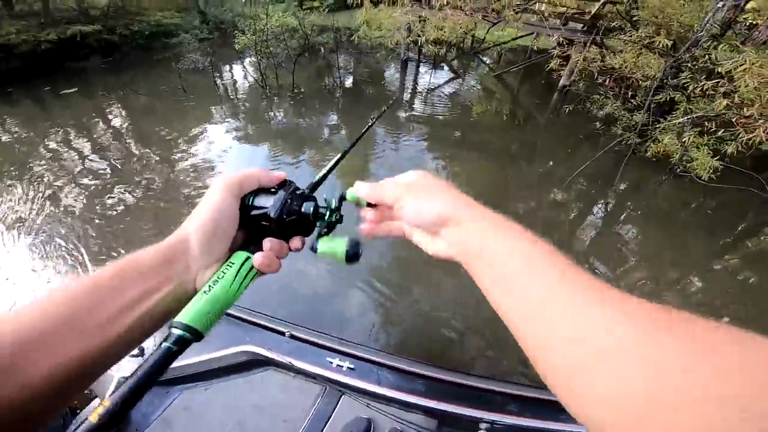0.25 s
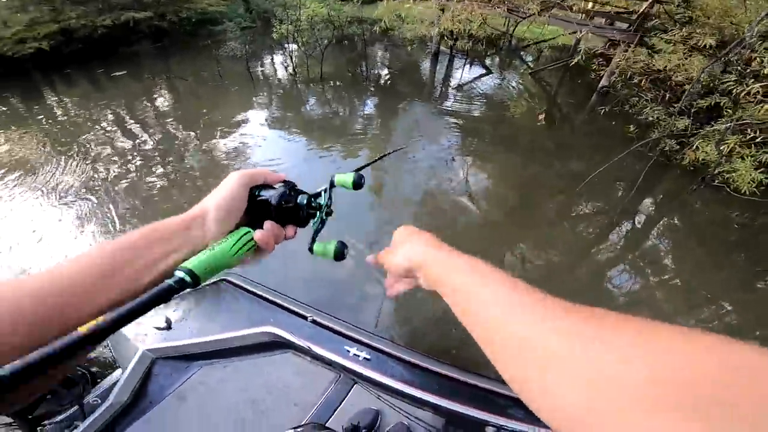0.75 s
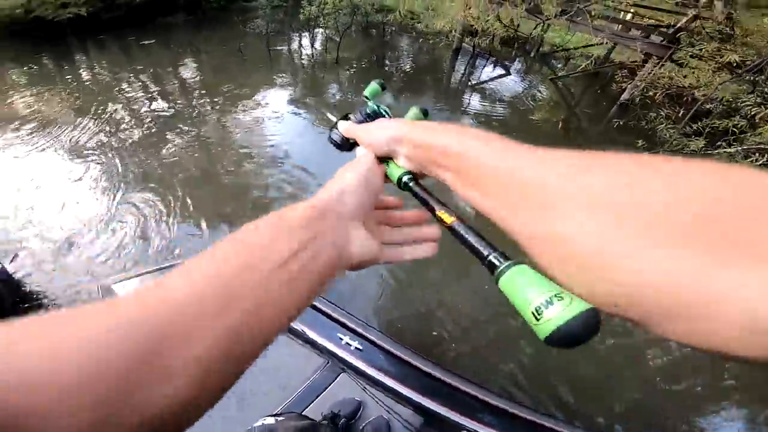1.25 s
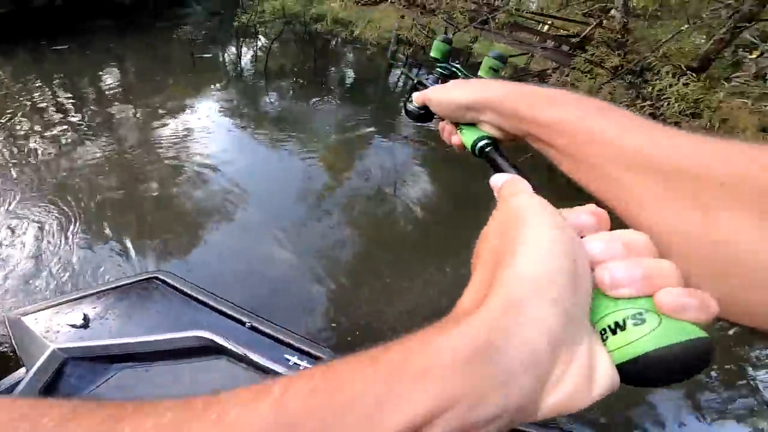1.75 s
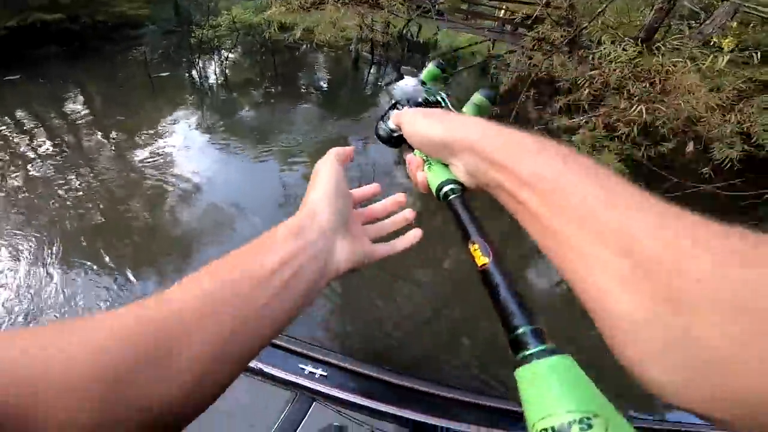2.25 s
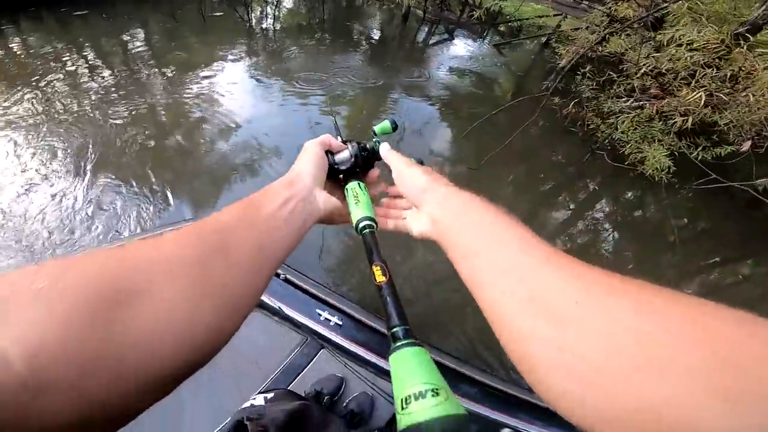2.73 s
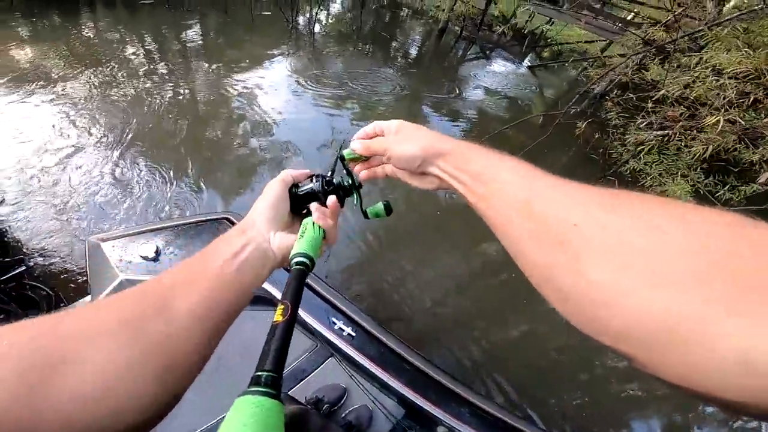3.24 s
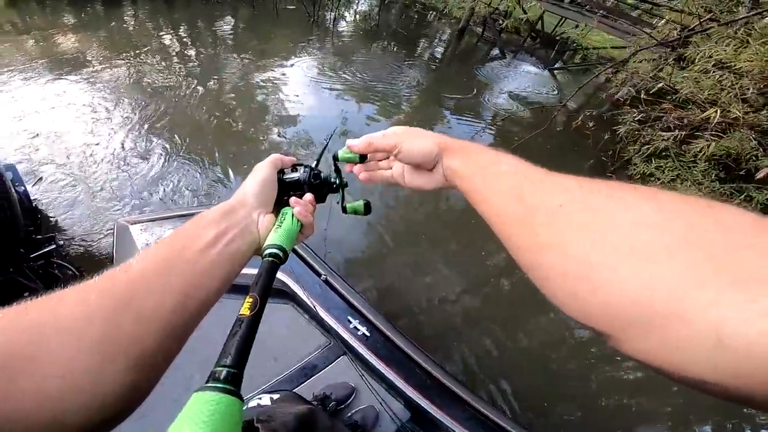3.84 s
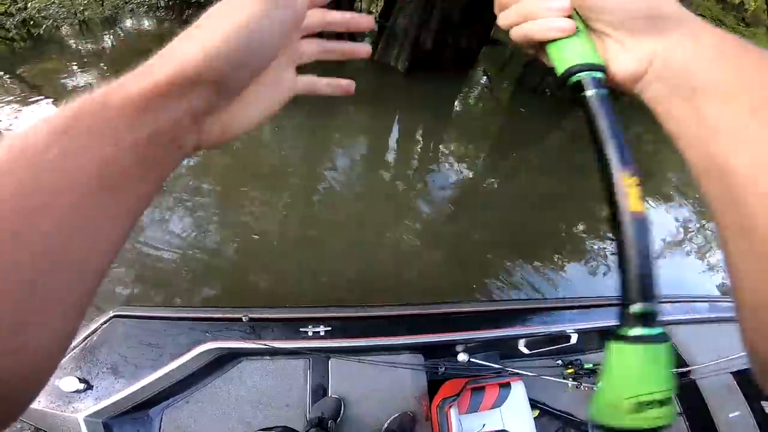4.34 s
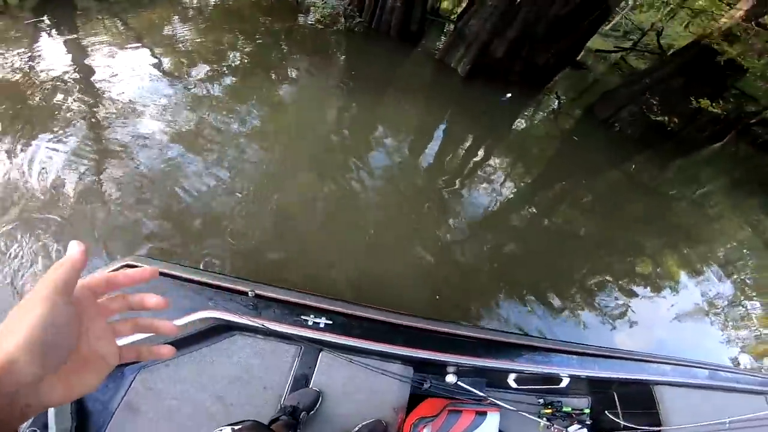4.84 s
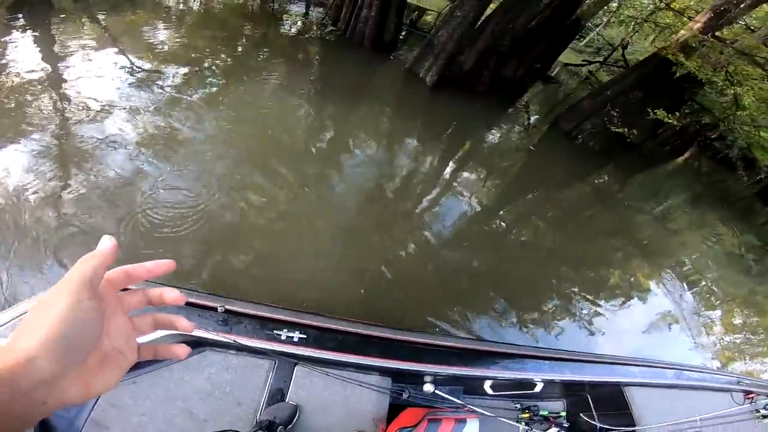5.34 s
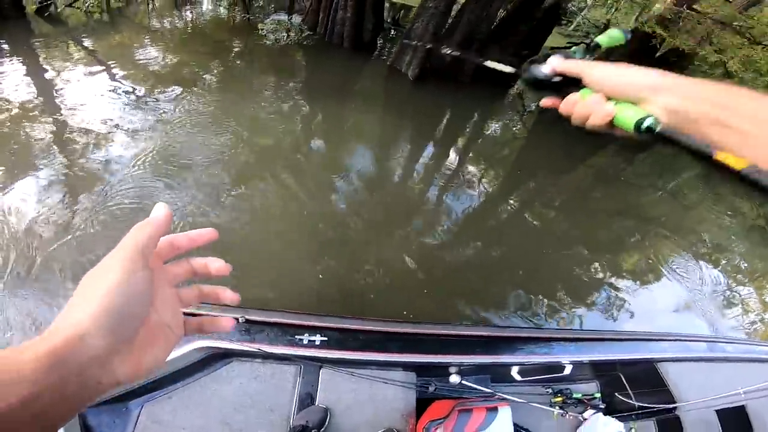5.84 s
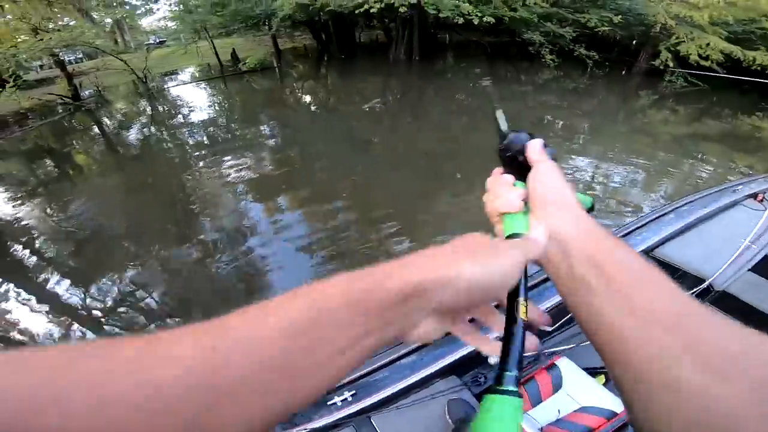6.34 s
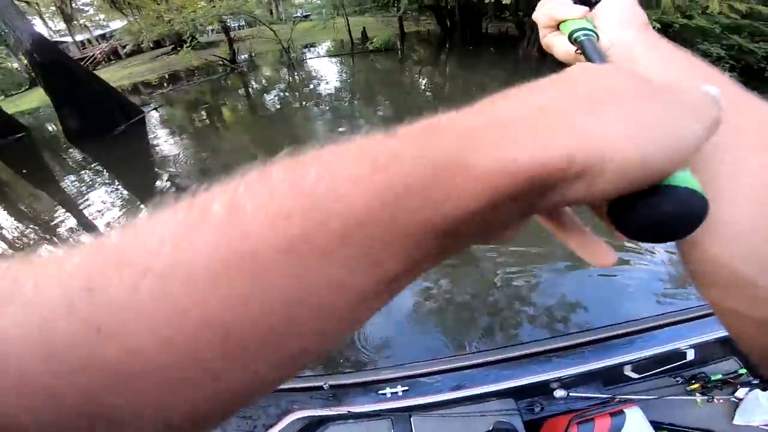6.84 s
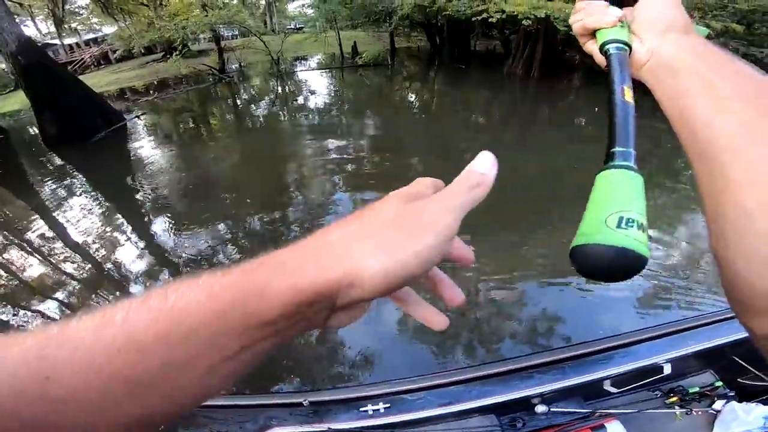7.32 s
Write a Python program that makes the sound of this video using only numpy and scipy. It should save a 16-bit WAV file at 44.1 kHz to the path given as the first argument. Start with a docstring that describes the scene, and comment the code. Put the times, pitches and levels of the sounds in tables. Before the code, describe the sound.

Crisp reel clicks and soft cranking, two rasping, falling spool whirrs, a small distant splash, insects shimmering and a low electric hum on quiet water.

```python
"""Two casts with a fishing reel

A baitcasting reel close by is cranked, disengaged and cast twice from a small boat.
Noise bursts through resonances make the snaps of thumb bar and clutch; uneven noise makes the whirr.
On a cast, noise scraped once a turn makes the spool, sines make it sing, and bright noise is the line.
An electric boat motor hums, decaying sines bump the hull, soft noise laps and rustles,
and insects trill in the trees on the bank: a far chorus of noise and a near singer of gliding strokes.
"""
import sys
import numpy as np
from scipy import signal
from scipy.fft import rfft, irfft, next_fast_len
from scipy.io import wavfile
from scipy.ndimage import uniform_filter1d, map_coordinates

SR = 44100
rng = np.random.default_rng(int(sys.argv[2]) if len(sys.argv) > 2 else 0)


def wav_record(signal):
    """Record a signal, one row per channel, as 16-bit PCM in the file named by sys.argv[1]."""
    frames = np.transpose(np.atleast_2d(signal))
    bounded = np.clip(frames, -1, 1)
    # unit amplitude maps onto the largest positive 16-bit level
    quanta = np.round(bounded * 32767).astype(np.int16)
    wavfile.write(sys.argv[1], SR, quanta)


N = 334278
T = np.arange(N) / SR  # time of each sample, in seconds

# Levels here set the balance within a table; the functions add their own fixed trims.

# contacts of thumb bar and clutch, each with a larger and a smaller part struck:
# start_s, level_db, tilt_db_per_octave, large_hz, large_db, small_hz, small_db, left_minus_right_db,
# t60_s (time for the burst to fall 60 dB)
CONTACTS = [(0.8185, -28, -3.5, 1540, -39, 2820, -37.5, 5.5, 0.0072),
            (0.823, -34, 1, 1620, -44, 7400, -49, -9, 0.0061),
            (0.8299, -36.5, -7, 1500, -48, 3800, -37.5, 1, 0.041),
            (1.1758, -50, 3, 1870, -45, 7800, -40, -6, 0.007),
            (1.1835, -26.5, 2, 3420, -30.5, 8650, -27.5, 2, 0.003),
            (1.186, -27, 5, 2130, -32, 7800, -31.5, -4, 0.0068),
            (2.779, -44, 2.5, 2520, -60, 5150, -43, -5, 0.009),
            (2.7814, -36.5, -7.5, 1870, -46, 3620, -64, 4, 0.045),
            (2.788, -46, -5, 1700, -73, 3220, -62, -2, 0.18),
            (2.9223, -47.5, 1.5, 2620, -41, 4680, -38.5, -0.5, 0.0039),
            (2.93, -43.5, -6, 1340, -60, 3330, -54.5, 1, 0.028),
            (3.032, -50, -4, 2170, -51, 3910, -55.5, 5.5, 0.0074),
            (3.0416, -43, 10, 1740, -37, 5640, -26, 8, 0.012),
            (3.0437, -22, 3, 4420, -17, 14000, -39, 1, 0.0052),
            (3.0482, -38, -1, 1280, -52, 4050, -46, 8.5, 0.011),
            (3.099, -37.5, -4.5, 1670, -39, 3330, -52, 6, 0.0086),
            (4.284, -43, -5.5, 1740, -48, 3340, -49.5, 1, 0.016),
            (4.2943, -24, 0.5, 3250, -20.5, 9100, -25.5, 0, 0.0074),
            (4.2952, -33.5, -6, 1035, -38, 1630, -35, 4.5, 0.0056),
            (4.298, -31.5, 7, 3400, -34, 7260, -31.5, 1.5, 0.0088),
            (6.2606, -39.5, -1, 1860, -38, 3280, -46, 1, 0.01),
            (6.2658, -26.5, 2.5, 2015, -26, 5330, -32.5, -0.5, 0.0033),
            (6.2693, -29, 1, 4270, -34, 8150, -42, -7, 0.014)]
STRUCK_OCTAVES = 0.5  # width of a struck part's ring
SNAP_LOW_HZ, SNAP_TOP_HZ = 247, 9900
RIGHT_LAG_S = .00002  # snaps reach the right side this much later
# ringing of the reel's frame and side plates: pitch_hz, width_hz, level_db
REEL = [(366, 450, -10), (790, 180, -5), (1650, 320, 1), (2520, 780, 4.5), (2940, 150, 5.5),
        (3250, 100, 4.5), (3600, 200, 4), (3965, 170, 0.5), (4990, 2500, -4), (7280, 280, 5.5),
        (8620, 110, -3), (9710, 120, -1), (13250, 730, -1)]
# fingers and line brushing the reel: start_s, level_db, brightness_db, length_s
BRUSHES = [(0.0495, -28.5, 4.5, 0.006), (0.077, -30, 3, 0.016), (0.236, -28, -3.5, 0.0051),
           (0.247, -25, 6, 0.02), (0.295, -30.5, -4, 0.02), (0.373, -27.5, -0.5, 0.0044),
           (0.394, -23.5, 5, 0.0037), (0.421, -38, -6, 0.0044), (0.458, -29, 2, 0.014),
           (0.523, -29, 2, 0.028), (0.701, -32, -6, 0.0093), (1.085, -31.5, 9, 0.018),
           (1.15, -37, 1, 0.0059), (1.163, -40, -10, 0.0071), (1.195, -40.5, 20, 0.049),
           (1.26, -39, 3, .004), (1.433, -35.5, 2, 0.036), (1.854, -29, 17, 0.015),
           (1.992, -25.5, 5, 0.008), (2.17, -32, 0, 0.009), (2.945, -33, -7.5, 0.0057),
           (2.97, -37.5, 3, 0.0071), (3.895, -35, -6, 0.0035), (4.129, -40, 7, 0.006),
           (4.155, -40, -4, .005), (4.216, -42, -4, .004), (4.258, -42.5, 3.5, .005),
           (4.266, -33.5, -0.5, 0.0032), (5.753, -26.5, 0.5, 0.0051), (5.794, -31, -4, 0.0034),
           (5.821, -33.5, -11.5, 0.008), (5.833, -30, 11.5, 0.0077), (5.873, -30.5, -10, 0.0039),
           (6.134, -32, 6.5, 0.0076), (6.15, -32, 1, 0.017), (6.313, -34, 0, 0.0051),
           (6.632, -40, -15, 0.012)]
BRUSH_LOW_DB, BRUSH_TOP_DB = -7.5, -15  # bass and treble of a brush of brightness 0
# small bright ticks of line and reel: start_s, level_db
TICKS = [(0.2056, -23.5), (0.6897, -31.5), (1.832, -29), (1.8795, -30), (1.8844, -32), (1.8955, -35),
         (1.9, -26), (1.904, -25), (2.121, -27.5), (2.1573, -32), (2.1725, -30.5), (2.214, -32),
         (2.282, -30), (2.3066, -34), (2.343, -39.5), (3.595, -41), (3.635, -40.5), (3.713, -39)]
# the handle hits its back-stop and rings one note
STOP_S, STOP_DB, STOP_HZ, STOP_T60_S = 3.0995, -34.5, 1320, 0.044

# spells of cranking or of line running through the guides: start_s, end_s, level_db
CRANKS = [(-0.05, .22, -56.5), (.26, .54, -53), (.5, .72, -55.5), (.9, 1.25, -65), (1.45, 1.8, -64),
          (2.42, 2.76, -69.5), (2.75, 3.08, -72), (3.6, 4.3, -67.5), (4.85, 5.35, -71.5), (5.78, 6.35, -61),
          (6.47, 6.8, -58)]
CRANK_RISE_S, CRANK_FALL_S = 0.095, 0.058  # the handle gathers and loses speed
IDLE_LINE_DB = -78.5  # slack line between spells
WHIRR_WAVER_DB, WHIRR_PATCH_DB, GEAR_RASP_DB = 1.3, 2.5, 2.2
# stray teeth and line coils that click within the whirr
FLICKS_PER_S, FLICK_DB, FLICK_SPREAD_DB = 70, -7, 3

# casts: release_s, stop_s (thumb on the spool), launch_turns_per_s, level_db, fade_db_per_s,
# surge_db, surge_s, scrape_sharpness (no unit), hiss_db, hiss_hz, loose_coils_db, spool_tone_db
CASTS = [(1.883, 2.778, 212, -53.5, 18.5, 6, 0.044, 13, 1.5, 10000, -28, -61),
         (6.861, 7.7, 265, -49.5, 11, 0.5, 0.028, 0.24, -6, 7800, 1.5, -45.5)]
SPIN_UP_S, SPOOL_BRAKE_HZ_PER_S = 0.054, 160
STEADY_RUB = .08  # share of the rub that goes on between scrapes
BLOOM_AFTER_S, BLOOM_S = 0.22, 0.19  # the coils loosen and flutter a moment after release
BLOOM_LOW_HZ, BLOOM_HIGH_HZ = 2800, 4030
COIL_SLAP_SHARPNESS = .7
HISS_SURGE, HISS_LOOSE = 1.6, 2.6  # the line hisses more in a surge and while its coils are loose
HISS_BROAD_DB, HISS_RING_DB, HISS_WIDTH_HZ = -9, -10, 1000  # broad hiss, and the guides' ring in it
SING_RISE_S, SING_FADE_DB_PER_S = 0.027, 26  # the spool's tone
SING_WAVER_DB, OVERTONE_WAVER_DB = 1.2, 3.5
# the spool tone's fundamental and overtones, in order: level_db
SING_PARTIALS_DB = [1, -9, -18.5, -15.5, -18, -18, -16, -25, -16, -14, -15, -15]

# ringing of the side plates while the reel runs: start_s, end_s, level_db, pitch_hz, width_hz
WHINES = [(0.05, 0.76, -63.5, 1460, 300), (1.744, 2.316, -56.5, 1720, 610), (2.45, 2.74, -70, 2600, 250),
          (2.4, 2.72, -66, 4120, 480), (4.117, 4.274, -65.5, 1637, 400), (6.953, 7.223, -57.5, 1845, 200),
          (7.264, 7.527, -56.5, 1755, 140)]
WHINE_EDGE_S = 0.047
# swishes of rod and line: peak_s, rise_s, fall_s, level_db, hiss_db, hiss_hz
SWISHES = [(1.83, 0.11, 0.037, -48, -67, 7500), (1.88, 0.057, 0.15, -66, -60, 13000),
           (1.868, 0.023, 0.1, -56, -44.5, 3830), (1.995, 0.036, 0.044, -45, -55, 9600),
           (6.77, 0.043, 0.027, -44.5, -54, 7100), (6.8, 0.013, 0.043, -40.5, -40.5, 7540),
           (6.84, 0.017, 0.019, -37.5, -47, 6800)]
SWISH_WIDTH_HZ, SWISH_FLUTTER_DB = 2400, 2.4
# small squeaks, whines and plops:
# start_s, level_db, pitch_hz, length_s, rise_octaves, roughness (0 is smooth, no unit)
BLIPS = [(0.033, -43, 1447, 0.0267, -0.51, 1.38), (0.226, -43, 1880, 0.017, -0.42, 1.05),
         (0.239, -41, 1020, 0.025, -0.15, 1), (0.927, -56, 1900, 0.1, .07, 0.55),
         (1.029, -51.5, 2206, 0.095, 0.26, 0.9), (1.378, -52, 1700, 0.023, 0.23, 0.7),
         (1.722, -49, 7160, .075, 0.25, .15), (1.905, -46, 725, 0.033, -0.49, 0.4),
         (2.414, -62, 2610, 0.28, -0.28, 0.3), (3.019, -48, 3170, 0.012, 0, 1),
         (3.509, -64, 1540, 0.041, -0.3, 0.36), (3.946, -59.5, 1096, 0.028, 0.98, 0.6),
         (4.193, -50, 1350, 0.01, -0.022, 0.7), (4.34, -56.5, 1020, 0.028, -0.13, .15),
         (4.607, -63, 1890, 0.023, .2, 0.3), (4.633, -61.5, 1780, 0.019, 0.1, 0.5),
         (4.77, -61, 1860, 0.017, .3, 0.5), (6.067, -48.5, 2070, 0.038, .3, 1.2),
         (6.242, -49, 1955, 0.038, -0.1, 0.74), (6.523, -51, 2194, 0.081, -0.4, 1.1)]
# swings of arms and body: middle_s, half_length_s, clothing_rustle_db, microphone_air_db
SWINGS = [(0.457, 0.48, -65, -65), (1.09, 0.26, -68.5, -63), (1.824, 0.073, -68, -49.5),
          (1.98, 0.4, -61.5, -68), (2.776, 0.4, -66, -68), (4.065, 0.037, -74, -58),
          (4.224, 0.13, -64.5, -90), (6.183, 0.57, -68.5, -62), (6.742, 0.086, -58.5, -43),
          (6.904, 0.41, -63, -86)]

MOTOR_HZ, MOTOR_IDLE_DB, MOTOR_RAMP_S = 152.6, -72.5, 0.021
# pushes of the boat motor: start_s, end_s, level_db
THRUSTS = [(1.55, 2.4, -76.5), (3.0, 3.52, -80.5), (4.18, 4.75, -64.5), (4.88, 5.58, -72)]
WATER_DB, WATER_DRIFT_DB = -73, -3  # steady lapping round the hull
# dull knocks on the hull, the rod and the water: start_s, level_db, pitch_hz, rise_s, t60_s
BUMPS = [(0.4, -50.5, 71.6, 0.023, 0.4), (0.8301, -46, 260, .001, 0.057), (1.429, -37.5, 130, 0.0056, 0.12),
         (1.434, -45.5, 76, 0.0073, 0.15), (1.783, -48, 44.3, 0.0033, 0.11), (2.11, -46, 153.8, 0.02, 0.55),
         (2.161, -41, 92.6, 0.014, 0.4), (2.175, -47.5, 206.6, 0.0098, .33),
         (3.0995, -32, 146, 0.00084, 0.017), (3.044, -44.5, 217, .001, 0.054),
         (3.103, -43, 64, 0.0016, 0.13), (4.031, -47, 70.7, 0.033, 0.25),
         (4.2951, -29.5, 454, 0.00078, 0.014), (4.296, -47, 654, 0.001, 0.06),
         (4.928, -51, 189, .002, 0.079), (5.872, -42, 424, 0.00085, 0.022),
         (6.265, -39.5, 455, .001, 0.023), (6.266, -34.5, 1230, 0.00063, 0.011),
         (6.633, -43, 205, 0.0024, 0.045), (6.635, -50, 24.7, .008, 0.54), (6.725, -38, 28, 0.017, 0.28)]
# tones within one knock: pitch_ratio (no unit), level_db
KNOCK_PARTIALS = [(1, 3.5), (1.28, -3), (2.05, -6.5)]
SPLASH_S, SPLASH_DB, SPLASH_RISE_S, SPLASH_FADE_DB_PER_S = 4.94, -57, 0.043, 32.5
SPRAY_HZ, SPRAY_WIDTH_HZ = 1420, 510
SPRAY_DB, SPRAY_RISE_S, SPRAY_FADE_DB_PER_S = -61.5, 0.092, 20

# songs of the near insect: start_s, end_s, level_db
TRILLS = [(0, 2, -66), (3.65, 5.3, -72.5), (4.25, 6.02, -66.5)]
STROKES_PER_S, STROKE_HZ, STROKE_FALL_HZ, TRILL_EDGE_S = 58, 4340, 840, 0.041
# level of the far insects over time: time_s, level_db
CHORUS = [(0, -56.5), (3, -57.5), (4.2, -58.5), (4.4, -64), (4.9, -59.5), (7.58, -60.5)]

# tone colours, the loudness of noise along the pitch range: pitch_hz, level_db
GEAR_TONE = [(290, -42), (500, -6), (896, -4), (1540, 7), (2170, 3), (2700, 0), (3090, 0), (3460, 1),
             (4230, 0), (5230, -16), (6210, -10), (6760, -7), (7360, -12), (10100, -7), (12000, -20.5),
             (14000, -18), (15000, -36.5)]
SPOOL_TONE = [(200, -16), (600, -7.5), (1200, -5.5), (1550, 2.5), (1750, 2), (1960, 0.5), (2500, 0),
              (3300, -0.5), (4100, -1), (5100, -6.5), (8000, -6), (10500, -10), (15000, -37)]
HISS_TONE = [(2000, -8), (5500, -30), (7800, 13.5), (9000, 5.5), (10200, 10), (11800, -8), (13800, 1),
             (15500, -64)]
WATER_TONE = [(25, -0.5), (80, -15.5), (120, -0.5), (200, 10), (350, -0.5), (600, -1.5), (1100, 0.5),
              (2500, -7), (6000, -7), (9000, -8), (14000, -37)]
CHORUS_TONE = [(5000, -39.5), (6100, -15), (6550, -5), (6880, 2.5), (7250, -6), (7550, -5.5), (8000, -13.5),
               (8400, -23.5), (11000, -51.5)]
SPLASH_TONE = [(150, -3.5), (400, -1.5), (900, 2.5), (1550, -10.0), (2200, -26), (6000, -13.0),
               (14000, -53.5)]
PUFF_TONE = [(8, -9.5), (18, -4.5), (35, -11.0), (80, -21.5), (200, -33.5), (600, -70.0)]
# how alike left and right are, for near, far and air sounds: pitch_hz, likeness (-1 to 1, no unit)
NEAR = [(130, .9), (300, -0.074), (640, 0.17), (1400, 0.45), (3100, 0.91), (6800, 0.94), (12000, -0.61)]
FAR = [(130, 0.17), (290, 0.69), (640, -0.35), (1400, -0.86), (3100, 0.62), (6800, 0.048), (15000, -0.56)]
PUFF_ALIKE = [(30, 0.088)]
TOP_HZ = 15800  # little is heard above this


def snaps():
    """Each contact is an impact with a short chatter: the reel rings, the two parts that meet most of all."""
    out = np.zeros((2, N))
    t = np.arange(SR // 10) / SR
    for s, db, tilt_db, large_hz, large_db, small_hz, small_db, pan_db, t60 in CONTACTS:
        chatter = rng.standard_normal(len(t)) * amp(-60 * t / t60) * (1 - np.exp(-t / 0.00042))
        chatter[np.searchsorted(t, .0003)] += 2.5  # the sharp first blow
        # the rod rings on, dully
        rod = band(rng.standard_normal(len(t)), 300, 1720) * amp(-23.0 - 60 * t / 0.098)
        ring = reel_body(even(chatter) + rod, direct_db=-28.5)
        tilted = filtered(ring, lambda hz: amp(tilt_db * np.log2(1 + hz / 1000)))
        whole = band(tilted, SNAP_LOW_HZ, SNAP_TOP_HZ)
        edge = 2 ** (STRUCK_OCTAVES / 2)
        large = unit(band(ring, large_hz / edge, large_hz * edge))
        small = unit(band(ring, small_hz / edge, small_hz * edge))
        snap = amp(db) * unit(whole) + amp(large_db) * large + amp(small_db) * small
        snap = amp(-12.0) * snap
        right = filtered(snap, lambda hz: np.exp(-2j * np.pi * hz * RIGHT_LAG_S))
        add(out, s, np.array([snap * amp(pan_db / 2), right * amp(-pan_db / 2)]))
    return out


def handling():
    """Soft brushes that swell and fade, tiny bright ticks of noise, and the handle's one-note stop."""
    out = np.zeros((2, N))
    t = np.arange(SR // 10) / SR
    for s, db, bright_db, length in BRUSHES:
        u = t / max(length / 4, .001)
        rub = reel_body(rng.standard_normal(len(t)) * u * np.exp(-u), direct_db=-21.0)
        low = amp(BRUSH_LOW_DB - bright_db) * unit(band(rub, 660, 1950))
        middle = amp(-1.5) * unit(band(rub, 1600, 5700))
        top = amp(BRUSH_TOP_DB + bright_db) * unit(band(rub, 7000, 11700))
        add(out, s - .002, amp(db - 28.0) * (low + middle + top))
    for s, db in TICKS:
        tick = reel_body(rng.standard_normal((2, len(t))) * amp(-60 * t / 0.004), direct_db=-34)
        add(out, s, amp(db - 30.0) * unit(band(tick, 6100, 12300)))
    add(out, STOP_S, amp(STOP_DB - 60 * t / STOP_T60_S) * np.sin(2 * np.pi * STOP_HZ * t))
    return out


def gears():
    """Gear teeth and running line make a fine, uneven whirr with stray clicks in it."""
    level = np.hypot(amp(IDLE_LINE_DB), spells(CRANKS, CRANK_RISE_S, CRANK_FALL_S))
    unevenness_db = WHIRR_WAVER_DB * wobble(45) + GEAR_RASP_DB * wobble(400)
    whirr = amp(1.0 + unevenness_db) * rush(GEAR_TONE, NEAR, patchy(depth_db=WHIRR_PATCH_DB))
    flicks = (rng.random(N) < FLICKS_PER_S / SR) * amp(FLICK_SPREAD_DB * rng.standard_normal(N))
    clicks = unit(band(reel_body(flicks, direct_db=-23.5), 1380, 5000))
    return level * (whirr + amp(FLICK_DB) * clicks)


def casts():
    """The spool surges, then coasts: it scrapes once a turn and sings at its speed, while line hisses."""
    out = np.zeros((2, N))
    for (release, stop, launch_speed, db, fade_db, surge_db, surge_s, sharpness,
         hiss_db, hiss_hz, coils_db, sing_db) in CASTS:
        age = np.maximum(T - release, 0)
        speed = launch_speed - SPOOL_BRAKE_HZ_PER_S * np.minimum(age, stop - release)
        angle = 2 * np.pi * np.cumsum(speed * (1 + .007 * wobble(60))) / SR
        surge = surge_db * swell(release, release, surge_s, surge_s)  # in dB

        scrape = np.sqrt(STEADY_RUB + np.exp(2 * sharpness * (np.cos(angle) - 1)))
        # the same rough spots of the bearing come round on every turn
        places = np.linspace(0, 2 * np.pi, 140)
        spots = np.array([np.interp(angle, places, row, period=2 * np.pi)
                          for row in rng.standard_normal((2, 140))])
        friction = rng.standard_normal((2, N)) + .33 * spots
        rub = friction * scrape * amp(1.5 * wobble(250) + 1.2 * wobble(40))
        spool = amp(surge) * rush(SPOOL_TONE, NEAR, rub)

        loosest = release + BLOOM_AFTER_S
        loose = amp(coils_db) * swell(loosest, loosest, BLOOM_S, 2 * BLOOM_S)
        slap = np.exp(COIL_SLAP_SHARPNESS * (np.cos(angle) - 1))  # the coils strike once a turn
        coils = loose * unit(band(rub[1] * slap, BLOOM_LOW_HZ, BLOOM_HIGH_HZ))

        line = rng.standard_normal((2, N)) * scrape
        broad = amp(HISS_BROAD_DB) * rush(HISS_TONE, NEAR, line)
        guide_ring = amp(HISS_RING_DB) * resonance(line[1], hiss_hz, HISS_WIDTH_HZ)
        hiss_gain = amp(hiss_db + HISS_SURGE * surge) * np.hypot(1, HISS_LOOSE * loose)
        hiss = hiss_gain * (broad + guide_ring)

        running = swell(release - SPIN_UP_S / 2, stop, SPIN_UP_S + surge_s / 2, 0.022)
        level = amp(db + 4.0 - fade_db * age) * running

        tone = np.zeros(N)
        for k, partial_db in enumerate(SING_PARTIALS_DB, 1):
            # the third and up also waver, each on its own
            waver_db = OVERTONE_WAVER_DB * (k > 2) * wobble(11)
            tone += amp(partial_db + waver_db) * np.sin(k * angle)
        sing = amp(sing_db - SING_FADE_DB_PER_S * age + SING_WAVER_DB * wobble(19))
        sing = sing * swell(release, stop, SING_RISE_S, 0.024)
        # the tone is slightly louder on the right
        out += level * (spool + coils + hiss) + sing * tone * amp([[-1], [1]])
    return out


def whines():
    """The running reel keeps its side plates ringing: narrow, wavering bands of noise."""
    out = np.zeros(N)
    for start, end, db, hz, width_hz in WHINES:
        ring = resonance(rng.standard_normal(N), hz, width_hz)
        out += amp(db) * swell(start, end, WHINE_EDGE_S, WHINE_EDGE_S) * ring
    return out


def swishes():
    """The rod whips forward and drags the line through air and guides: fluttering swells of noise."""
    out = np.zeros((2, N))
    for s, rise_s, fall_s, db, hiss_db, hiss_hz in SWISHES:
        hiss = resonance(rng.standard_normal(N), hiss_hz, SWISH_WIDTH_HZ)
        flutter = unit(amp(SWISH_FLUTTER_DB * (wobble(110) + wobble(500))))
        sound = amp(db) * rush(SPOOL_TONE, NEAR) + amp(hiss_db) * hiss
        out += flutter * swell(s, s, rise_s, fall_s) * sound
    return out


def blips():
    """Short tones that glide; the rough ones scatter in pitch."""
    out = np.zeros((2, N))
    for s, db, hz, length, octaves, rough in BLIPS:
        u = np.linspace(0, 1, int(length * SR))
        scatter = unit(uniform_filter1d(rng.standard_normal(SR // 2), size=30))[:len(u)]
        pitch = hz * 2 ** (octaves * (u - .5)) * (1 + 0.186 * rough * scatter)
        tone = np.sin(2 * np.pi * np.cumsum(pitch) / SR)
        add(out, s, amp(db - 1.5) * np.sin(np.pi * u) * tone)
    return out


def angler():
    """Each swing of the body rustles clothing and pushes air over the microphone."""
    rustle, air = np.zeros(N), np.zeros(N)
    for s, half_length, rustle_db, air_db in SWINGS:
        motion = swell(s, s, half_length, half_length)
        rustle = np.hypot(rustle, amp(rustle_db) * motion)
        air = np.hypot(air, amp(air_db) * motion)
    puffs = rush(PUFF_TONE, PUFF_ALIKE)
    return rustle * wash() + air * puffs * amp([[-3], [2]])


def boat():
    """A wavering motor hum with a tone an octave below, lapping noise, and knocks of decaying tones."""
    phase = 2 * np.pi * np.cumsum(MOTOR_HZ + 3.95 * wobble(22)) / SR
    waver_db = 1.3 * wobble(16)
    effort = amp(MOTOR_IDLE_DB) + spells(THRUSTS, MOTOR_RAMP_S, MOTOR_RAMP_S)
    octave_below = amp(-15.5 + 4.8 * wobble(18.0)) * np.sin(phase / 2)
    hum = effort * amp(5.0 + waver_db) * (np.sin(phase) + octave_below)
    out = hum + amp(WATER_DB + WATER_DRIFT_DB * wobble(3.427)) * wash()
    t = np.arange(SR // 2) / SR
    for s, db, hz, rise, t60 in BUMPS:
        knock = np.zeros(len(t))
        for ratio, level_db in KNOCK_PARTIALS:
            start_phase = rng.uniform(0, 2 * np.pi)
            fading = amp(level_db - 60 * t * ratio / t60)  # higher tones die sooner
            knock += fading * np.sin(2 * np.pi * hz * ratio * t + start_phase)
        add(out, s, amp(db) * (1 - np.exp(-t / rise)) * knock)
    return out


def splash():
    """A soft, spattering wash of noise across the water, and the spray that lingers after it."""
    age = np.maximum(T - SPLASH_S, 0)
    level = amp(SPLASH_DB - SPLASH_FADE_DB_PER_S * age) * swell(SPLASH_S, np.inf, SPLASH_RISE_S, 1)
    spatter = unit(amp(3.6 * wobble(300)))
    spray_level = amp(SPRAY_DB - SPRAY_FADE_DB_PER_S * age) * swell(SPLASH_S, np.inf, SPRAY_RISE_S, 1)
    spray = spray_level * resonance(rng.standard_normal((2, N)), SPRAY_HZ, SPRAY_WIDTH_HZ)
    return spatter * (spray + level * rush(SPLASH_TONE, FAR))


def insects():
    """A far chorus, and a near singer whose wing strokes each fall in pitch, in runs with one left out."""
    chorus_db = np.interp(T, *np.transpose(CHORUS)) + 0.62 * wobble(48)
    chorus = amp(chorus_db) * rush(CHORUS_TONE, FAR)
    # number of the wing stroke, and how far through it we are (0 to 1)
    stroke, u = np.divmod(np.cumsum(STROKES_PER_S + 1.5 * wobble(18)) / SR, 1)
    rests = np.cumsum(rng.integers(9, 19, size=80))
    gate = np.sin(np.pi * u) ** 3 * ~np.isin(stroke, rests)
    pitch_hz = STROKE_HZ - STROKE_FALL_HZ * (u - .5) + 35 * wobble(60)
    song = unit(gate * np.sin(2 * np.pi * np.cumsum(pitch_hz) / SR))
    # the direct song is slightly louder on the left
    song = song * amp([[1], [-1]]) + amp(-12.0) * bank(song[None], t60=0.17)
    singing = spells(TRILLS, TRILL_EDGE_S, TRILL_EDGE_S) * amp(2.1 * wobble(27))
    return chorus + singing * song


def bank(x, t60):
    """A faint scattered answer from the boat and the trees: x smeared by fading noise."""
    t = np.arange(SR // 2) / SR
    tail = band(rng.standard_normal((2, len(t))), 300, 6000)
    tail = tail * amp(-60 * t / t60) * (1 - np.exp(-t / 0.00596))
    return signal.fftconvolve(x, tail / np.linalg.norm(tail[0]), axes=1)[:, :N]


def wash():
    """A soft, patchy noise, shared by water and cloth."""
    return amp(8.0 + 1.35 * wobble(13)) * rush(WATER_TONE, FAR, patchy(depth_db=3.5))


def reel_body(x, direct_db):
    """The reel's resonances, plus the direct sound of the contact."""
    def response(f):
        ringing = sum(amp(db) * 1j * f * width / (hz * hz - f * f + 1j * f * width)
                      for hz, width, db in REEL)
        return amp(direct_db) + ringing
    return filtered(x, response)


def resonance(x, hz, width_hz):
    """x through one resonance with steep skirts, at rms 1."""
    return unit(filtered(x, lambda f: (1j * f * width_hz / (hz * hz - f * f + 1j * f * width_hz)) ** 2))


def rush(spectrum, alike, source=None):
    """Coloured stereo sound of rms 1, from white noise unless a source is given."""
    source = rng.standard_normal((2, N)) if source is None else source

    def response(hz):
        turn = np.arccos(np.clip(along(alike, hz), -1, 1)) / 2
        return amp(along(spectrum, hz)) * [np.cos(turn), np.sin(turn)]
    mid, side = filtered(source, response)
    return unit(np.array([mid + side, mid - side]))


def patchy(depth_db):
    """White noise with brief random patches of colour."""
    z = signal.stft(rng.standard_normal((2, N)), nperseg=512)[2]
    field = uniform_filter1d(rng.standard_normal(z.shape[1:]), size=7, axis=0)
    field = uniform_filter1d(field, size=5, axis=1)
    return signal.istft(z * amp(depth_db * unit(field)), nperseg=512)[1][:, :N]


def even(x):
    """Level out the chance peaks and holes in the spectrum of a short burst."""
    power = np.abs(uniform_filter1d(np.abs(rfft(x)) ** 2, size=45))
    gain = np.sqrt(power.mean() / (power + 1e-12))
    return filtered(x, lambda hz: np.interp(hz, np.fft.rfftfreq(len(x), 1 / SR), gain))


def swell(start, end, rise_s, fall_s):
    """Gain that rises smoothly to 1 at start, holds until end and falls away."""
    before, after = np.minimum(T - start, 0), np.maximum(T - end, 0)
    return np.exp(-(before / rise_s) ** 2 - (after / fall_s) ** 2)


def spells(rows, rise_s, fall_s):
    """Gain of a source that sounds in spells; where they overlap the louder one counts."""
    return np.max([amp(db) * swell(start, end, rise_s, fall_s) for start, end, db in rows], axis=0)


def wobble(rate):
    """A smooth random curve, with rate random points a second."""
    return map_coordinates(rng.standard_normal(int(N * rate / SR) + 4), [T * rate])


def band(x, lo_hz, hi_hz):
    """Keep mainly the pitches between two limits."""
    limits = [lo_hz, min(hi_hz, SR / 2 - 1)]
    return signal.sosfilt(signal.butter(3, limits, 'band', fs=SR, output='sos'), x)


def filtered(x, response):
    """x times a complex response of frequency."""
    n = x.shape[-1]
    m = next_fast_len(n + SR // 10)  # spare room, so that ringing can die away
    return irfft(rfft(x, m) * response(np.fft.rfftfreq(m, 1 / SR)), m)[..., :n]


def along(points, hz):
    """Read a value off (Hz, value) points on a log pitch axis."""
    f, v = np.transpose(points)
    return np.interp(np.log(hz + 1), np.log(f + 1), v)


def amp(db):
    """Decibels to gain."""
    return 10 ** (np.asarray(db) / 20)


def unit(x):
    """Scale to rms 1."""
    return x / np.sqrt(np.mean(x ** 2) + 1e-20)


def add(track, s, sound):
    """Mix a sound in at time s."""
    i = round(s * SR)
    track[:, i:i + sound.shape[-1]] += sound[..., :N - i]


def scene():
    """The reel close by, the boat below, the bank around."""
    reel = snaps() + handling()
    reel_and_echo = reel + amp(-35.0) * bank(reel, t60=0.16)
    casting = gears() + casts() + whines() + swishes() + blips() + angler()
    return reel_and_echo + casting + boat() + splash() + insects()


def record(dry):
    """Round off the highest peaks and cut steeply above the top pitch."""
    held = dry / (1 + (dry / .86) ** 12) ** (1 / 12)
    return filtered(held, lambda hz: 1 / np.sqrt(1 + (hz / TOP_HZ) ** 120))


dry = scene()
out = record(dry)
wav_record(out)
```